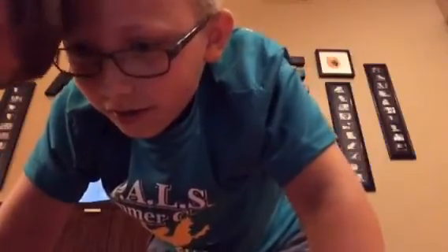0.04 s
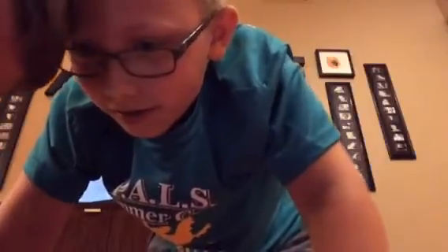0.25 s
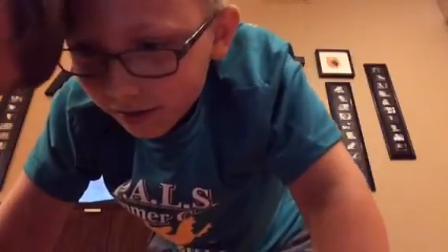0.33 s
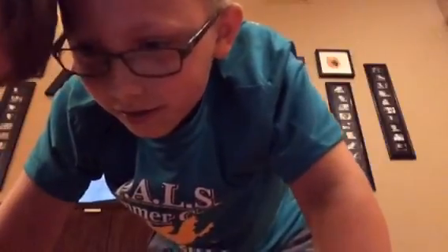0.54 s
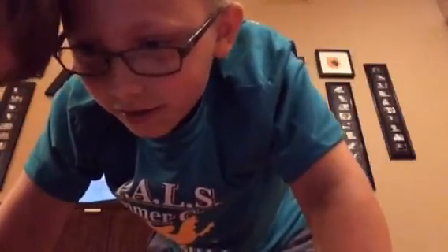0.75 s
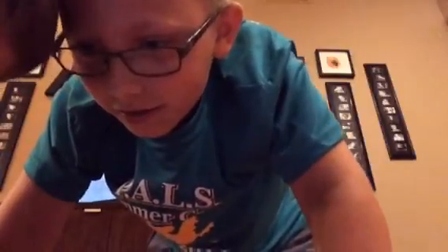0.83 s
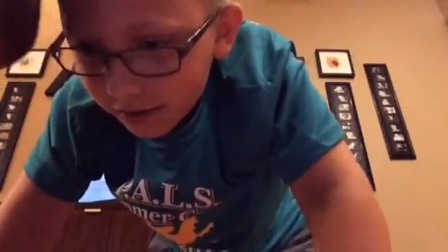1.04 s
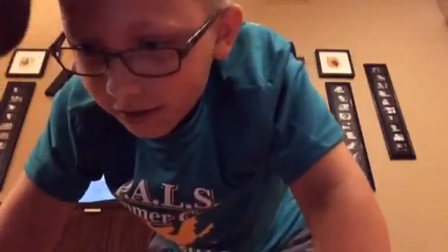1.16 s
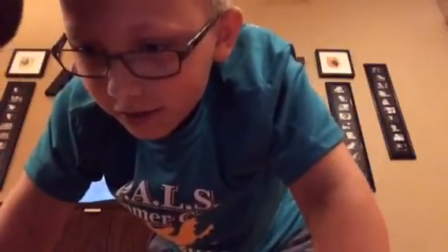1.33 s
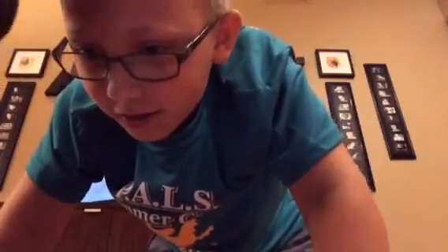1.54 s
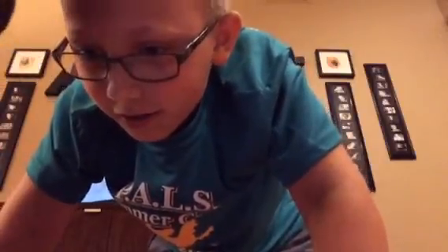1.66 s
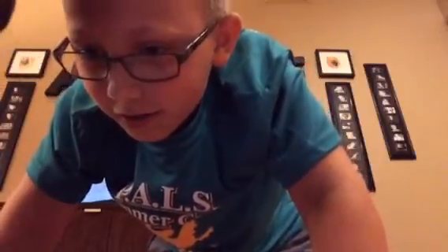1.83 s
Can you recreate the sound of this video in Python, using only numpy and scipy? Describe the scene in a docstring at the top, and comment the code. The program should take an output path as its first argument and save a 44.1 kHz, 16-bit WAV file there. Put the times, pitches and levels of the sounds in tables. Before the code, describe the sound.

A plastic game spinner is flicked close to the microphone, with one sharp, loud snap at about 0.2 seconds. The arrow whirrs round, making quick, uneven ticks and light hollow knocks against its board, much softer than the snap. The clicks thin out around 1 second, and the arrow scrapes faintly to a stop by about 1.3 seconds. Only the low hush of a quiet room remains.

```python
"""Game spinner, close up

A plastic spinner on its board, close to the microphone in a quiet room. A fingernail snaps against
the arrow, which slams on its loose pivot and whirrs round. The hub knocks on the hollow board, and
the arrow ticks unevenly as it slows, then scrapes to a stop after about a second."""
import sys
import numpy as np
from scipy import signal
from scipy.fft import rfft, irfft
from scipy.io import wavfile

SR = 44100
rng = np.random.default_rng(int(sys.argv[2]) if len(sys.argv) > 2 else 0)


def digitize_waveform(pressure):
    """Quantize a signal to 16-bit integers and store it at the path in sys.argv[1].

    Rows of a 2-D input are taken as channels; values are limited to [-1, 1].
    """
    field = np.atleast_2d(pressure).T
    bounded = np.clip(field, -1, 1)
    quanta = np.round(bounded * 32767).astype(np.int16)
    wavfile.write(sys.argv[1], SR, quanta)


N = 83790

# Levels in the tables are relative; each source adds its own gains.
# blows of the flick, the slam on the pivot last: t/s, level/dB, fade time constant/s
BLOWS = [(.1912, -59, .002), (.1975, -57, .004), (.2128, -28, .002), (.2147, -11.5, .0038),
         (.221, -11, .0048)]
# board modes under the flick: f/Hz, width/Hz, level under the nail/dB, level under the slam/dB
FLICK_MODES = [(265, 70, 2.5, -11), (377, 160, 1, -10.5), (953, 60, 2.5, 1), (1100, 50, -0.5, 1.5),
               (1261, 50, 1, 4), (1467, 190, 5.5, -1.5), (1694, 100, 10, 4), (1907, 100, 8.5, 12),
               (2055, 64, 0.5, 6.5)]
# spectrum of a blow's crack: f/Hz, level/dB
CRACK_COLOUR = [(60, -30), (250, -6), (650, -9), (3200, -6.5), (4000, -2), (5300, -11.5), (9200, -1.5),
                (10500, -13.5), (13000, -18.5), (15500, -36.5)]
# arrow modes rung by the slam: f/Hz, width/Hz, level/dB
TWANG_MODES = [(2745, 60, -7), (3716, 50, -6), (4043, 43, 0), (4412, 55, -6), (7173, 70, -8),
               (8400, 50, -6), (8968, 45, -1), (9136, 80, -4)]
# ticks of the arrow on its pivot: t/s, level/dB, treble lift/dB, chatter length/s, strongest ring/Hz
PIVOT_TICKS = [(0.111, -52.5, 2, 0.0026, 5500), (0.296, -16.5, -13, 0.002, 8600),
               (0.3993, -29, -6, 0.0017, 8800), (0.423, -27, -5.5, 0.0018, 3660),
               (0.4995, -27.5, 4, 0.0015, 3920), (0.5825, -27.5, -4, 0.0039, 7630),
               (0.593, -35, -8, 0.0015, 7900), (0.6394, -34, 20, 0.0011, 10600),
               (0.675, -28, -5, 0.0024, 8100), (0.6817, -35, -5, 0.0049, 6700),
               (0.7418, -30, -2, 0.0024, 4720), (0.786, -26, 2, 0.00083, 3860),
               (0.7889, -29.5, -8, 0.004, 3970), (0.8145, -28.5, 5, 0.00097, 9900),
               (0.82, -30, -1, 0.0015, 8550), (0.8589, -26.5, -10.5, 0.0027, 8400),
               (0.9268, -30.5, -3.5, 0.0016, 8170), (0.9332, -30, -6, 0.0018, 8700),
               (0.953, -40, -17, 0.013, 4670), (1.0198, -31, 1.5, 0.00091, 4200),
               (1.1188, -27.5, -9, 0.0021, 6300), (1.1249, -33.5, -9.5, 0.0088, 4140),
               (1.199, -42.5, -18, 0.0049, 4680), (1.208, -37.5, -4, 0.0077, 4840),
               (1.2293, -33, -4.5, 0.0012, 8700), (1.2364, -34.5, -6, 0.0018, 9200)]
# spectrum of the ticking and rubbing: f/Hz, level/dB
ARROW_COLOUR = [(650, -2.5), (1400, -7), (2400, 1), (3300, -6.5), (4200, -2), (5600, -4.5), (6600, -6),
                (8500, 2), (10800, -3.5), (13000, -11), (15500, -22)]
# arrow resonances under ticking and rubbing: f/Hz, width/Hz, level/dB
ARROW_MODES = [(4080, 290, -4), (6530, 250, -2.5), (8510, 160, -12.5), (8800, 210, -3.5)]
# rubbing of the arrow: t/s, level/dB
SCRAPE_CURVE = [(.22, -27), (.25, -38), (.28, -36), (.30, -39.5), (.35, -47.5), (.44, -60.5), (.9, -70.5),
                (1.06, -62), (1.11, -71.5), (1.19, -57.5), (1.25, -96)]
# dull knocks of the hub on the board: t/s, level/dB, strongest ring/Hz
HUB_KNOCKS = [(0.326, -37.5, 1525), (0.3653, -35.5, 1334), (0.3824, -34.5, 1464), (0.453, -37.5, 1373),
              (0.4928, -35.5, 1350), (0.5709, -37.5, 1325), (0.7095, -36.5, 1395), (0.7677, -41, 1970),
              (0.827, -40, 1450), (0.9815, -40.5, 2007), (1.118, -46, 1397), (1.329, -66, 1460)]
# rolling of the hub: t/s, level/dB
WHIRR_CURVE = [(.22, -35.5), (.3, -42.5), (.42, -54), (.58, -50), (.8, -55), (.95, -53), (1.03, -60.5),
               (1.12, -56), (1.25, -57.5), (1.33, -73)]
# board resonances under the turning hub: f/Hz, width/Hz, level/dB
BOARD_MODES = [(1371, 110, -2), (1452.4, 90, -1), (1926, 39, -7), (2086, 270, -3.5), (2550, 1100, -11),
               (6950, 300, -13), (7920, 340, -18)]
# soft bumps of the board on its surface: t/s, level/dB, f/Hz
BOARD_THUDS = [(0.2233, -35, 240), (.239, -47, 58), (0.257, -42, 150), (1.033, -54.5, 300)]
# spectrum of the room's tail: f/Hz, level/dB
TAIL_COLOUR = [(400, -2.5), (8000, 6), (15000, -10.5)]
# spectrum of the room tone: f/Hz, level/dB
HUSH_COLOUR = [(25, -30.5), (60, -5), (115, 1.5), (200, -5.5), (370, -8.5), (700, -19), (1400, -21.5),
               (2400, -28.5), (9300, -31), (15500, -45)]

BLOW_HOLD_S, CRACK_DB, PUSH_DB, CONTACT_RING_DB, TWANG_DB = 0.0023, -1, 21.5, -11, 4.5
TICK_DB, TICK_FADE_S, TICK_BAND_HZ, LIFT_HZ = -14.5, 0.0026, (1400, 13800), 6210
ARROW_RING_DB, PING_DB, PING_WIDTH_HZ = -8, -3.5, 400
BOUNCES_PER_S, GRAINS_PER_S = 3000, 7500
KNOCK_DB, KNOCK_RISE_S, KNOCK_FADE_S, KNOCK_RATTLE_DB = -2.5, 0.0014, 0.0057, -4
DULL_FROM_S, DULL_DB_PER_S = 1.0, 32
ROOM_DB, ROOM_GAP_S, ROOM_T60_S, HUSH_DB = -19, 0.0046, 0.19, -62.5


def flick():
    """The nail strikes the arrow, which slams on its pivot and twangs; each blow rings the board."""
    crack, rings, slam_s = 0, 0, BLOWS[-1][0]
    for s, db, fade in BLOWS:
        contact = undb(db) * chatter(s, BLOW_HOLD_S, fade)
        push = undb(db + PUSH_DB) * signal.unit_impulse(N, round(s * SR))
        modes = [(hz, width, slam if s == slam_s else nail) for hz, width, nail, slam in FLICK_MODES]
        rings += through(push + undb(CONTACT_RING_DB) * contact, ringing(modes))
        crack += contact
    twang = through(signal.unit_impulse(N, round(slam_s * SR)), ringing(TWANG_MODES))
    return undb(CRACK_DB) * through(crack, response(CRACK_COLOUR)) + rings + undb(TWANG_DB) * twang


def arrow():
    """The arrow rubs and ticks: a tick is a burst of tiny bounces, each contact with its own ring."""
    ticks, pings = 0, 0
    highpass = signal.butter(2, LIFT_HZ, "high", fs=SR)
    per_sample = BOUNCES_PER_S / SR
    bounce_count = np.floor(np.cumsum(rng.exponential(per_sample, N)))
    bounces = np.diff(bounce_count, prepend=0) / np.sqrt(per_sample)
    for s, db, lift_db, length, hz in PIVOT_TICKS:
        tick = undb(db + TICK_DB) * bounces * chatter(s, length, TICK_FADE_S)
        treble = signal.filtfilt(*highpass, tick)
        ticks += (tick - treble) * undb(-lift_db / 2) + treble * undb(lift_db / 2)
        pings += through(tick, ringing([(hz, PING_WIDTH_HZ, 0)], size=512))
    ticks = signal.lfilter(*signal.butter(2, TICK_BAND_HZ, "band", fs=SR), ticks)
    force = ticks + friction(SCRAPE_CURVE, rough_db=2)
    rings = undb(ARROW_RING_DB) * through(force, ringing(ARROW_MODES)) + undb(PING_DB) * pings
    return through(force, response(ARROW_COLOUR)) + rings


def hub():
    """The wobbling hub rolls and knocks on the hollow board, duller as it slows."""
    force, knocks = friction(WHIRR_CURVE, rough_db=3), 0
    for s, db, hz in HUB_KNOCKS:
        t = since(s)
        swell = (1 - np.exp(-t / KNOCK_RISE_S)) * np.exp(-t / KNOCK_FADE_S)
        knocks += 2 * undb(db + KNOCK_DB) * swell * np.sin(2 * np.pi * hz * t)
        force += undb(db + KNOCK_RATTLE_DB) * chatter(s, 0, KNOCK_FADE_S)
    t, modes = np.arange(SR // 10) / SR, []
    for hz, width, db in BOARD_MODES:
        fade = np.exp(-np.pi * width * t)
        envelope = fade - fade ** 4  # the soft onset darkens the valleys between resonances
        modes.append(undb(db) * width * envelope * np.sin(2 * np.pi * hz * t))
    lower = through(force, sum(modes[:2]))
    upper = through(force, sum(modes[2:])) * undb(-DULL_DB_PER_S * since(DULL_FROM_S))
    return knocks + (lower + upper) / np.linalg.norm(sum(modes))


def thuds(fade_s=0.01):
    """The board bumps softly on the surface under it."""
    return sum(undb(db) * np.exp(-since(s) / fade_s) * np.sin(2 * np.pi * hz * since(s))
               for s, db, hz in BOARD_THUDS)


def room(direct):
    """The short diffuse tail of a furnished room, well under the direct sound at this distance."""
    t = since(ROOM_GAP_S)
    tail = rng.standard_normal(N) * (t > 0) * np.exp(-np.log(1000) * t / ROOM_T60_S)
    reflections = through(direct, unit(tail) / np.sqrt(N))
    return undb(ROOM_DB) * through(reflections, response(TAIL_COLOUR))


def room_tone():
    """A low steady hush behind the spinner."""
    return undb(HUSH_DB) * unit(through(rng.standard_normal(N), response(HUSH_COLOUR, size=8192)))


def chatter(start, hold, fade):
    """A contact: dense tiny impacts that hold briefly and die away."""
    t = since(start)
    return np.sign(rng.standard_normal(N)) * (t > 0) * np.exp(-np.maximum(t - hold, 0) / fade)


def friction(curve, rough_db, catch_hz=160):
    """Dense uneven grains of sliding contact that follow a level curve."""
    t = np.arange(N) / SR
    s, db = np.array(curve).T
    grains = rng.standard_normal(N) * (rng.random(N) < GRAINS_PER_S / SR)
    catch = np.interp(t * catch_hz, np.arange(N), rng.standard_normal(N))
    level = undb(np.interp(t, s, db)) * (t > s[0]) * (t < s[-1])
    return unit(grains * undb(rough_db * catch)) * level


def ringing(modes, size=8192):
    """Unit-energy impulse response of resonances: f/Hz, width/Hz, level/dB."""
    t = np.arange(size) / SR
    ring = sum(undb(db) * width * np.exp(-np.pi * width * t) * np.cos(2 * np.pi * hz * t)
               for hz, width, db in modes)
    return unit(ring) / np.sqrt(size)


def response(points, size=2048):
    """Unit-energy impulse response with a given spectrum: f/Hz, level/dB."""
    hz, db = np.array(points, float).T
    f = np.maximum(np.arange(size // 2 + 1) * SR / size, 1)
    gain = undb(np.interp(np.log(f), np.log(hz), db))
    cepstrum = irfft(np.log(gain))
    cepstrum[1:size // 2] *= 2  # fold to minimum phase, keeping attacks sharp
    cepstrum[size // 2 + 1:] = 0
    return unit(irfft(np.exp(rfft(cepstrum)))) / np.sqrt(size)


def through(x, impulse_response):
    """Send a sound through an impulse response."""
    return signal.fftconvolve(x, impulse_response)[:N]


def since(start):
    """Seconds since a moment, zero before it."""
    return np.maximum(np.arange(N) / SR - start, 0)


def undb(db):
    """Decibels to gain."""
    return 10 ** (np.asarray(db) / 20)


def unit(x):
    """Scale to rms 1."""
    return x / np.sqrt(np.mean(x ** 2))


def scene():
    """One microphone: the spinner close up, the quiet room behind it."""
    hush = room_tone()
    spinner = flick() + thuds() + arrow() + hub()
    return (spinner + room(spinner) + hush)[None]


def record(dry):
    """The microphone rounds the loudest peaks and cuts the top."""
    ceiling, top_hz = undb(-9), 15000
    rounded = ceiling * np.tanh(dry / ceiling)
    return signal.sosfilt(signal.ellip(8, .2, 70, top_hz, fs=SR, output="sos"), rounded)


dry = scene()
out = record(dry)
digitize_waveform(out)
```